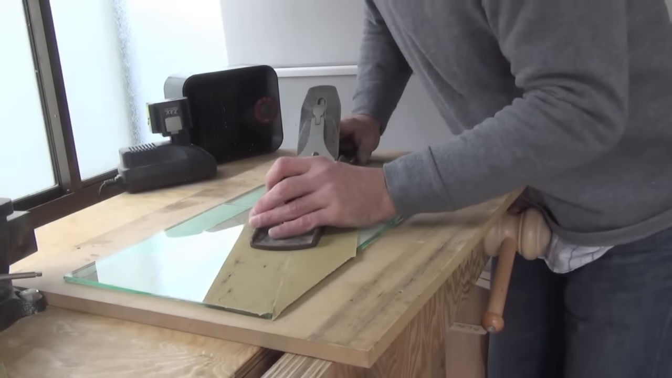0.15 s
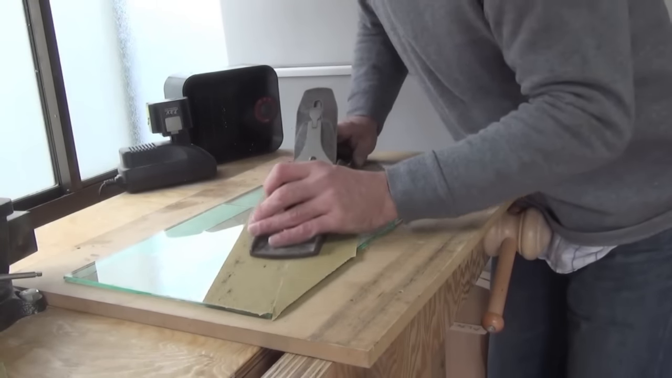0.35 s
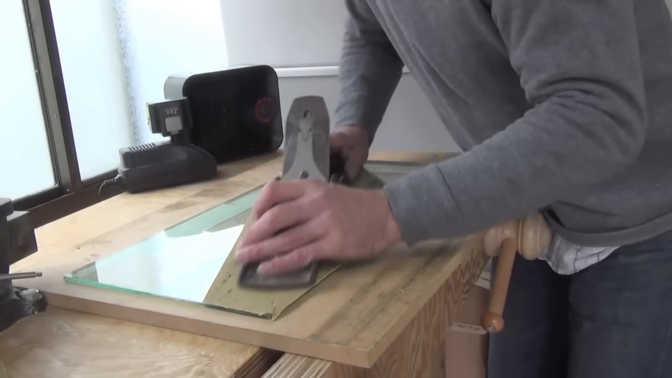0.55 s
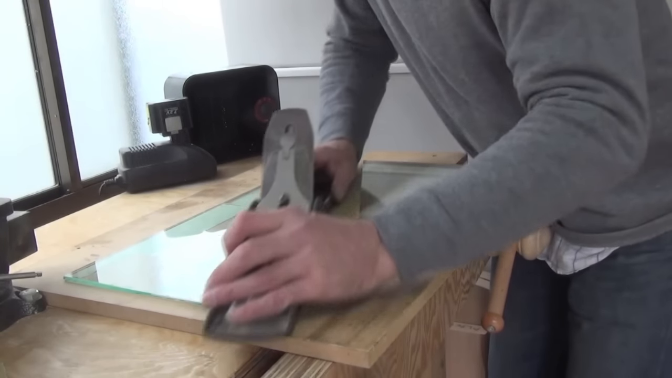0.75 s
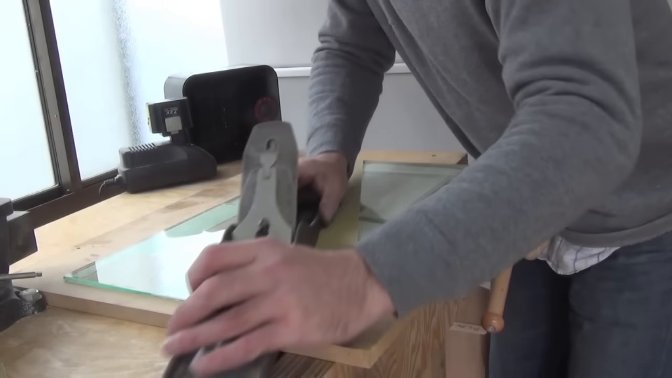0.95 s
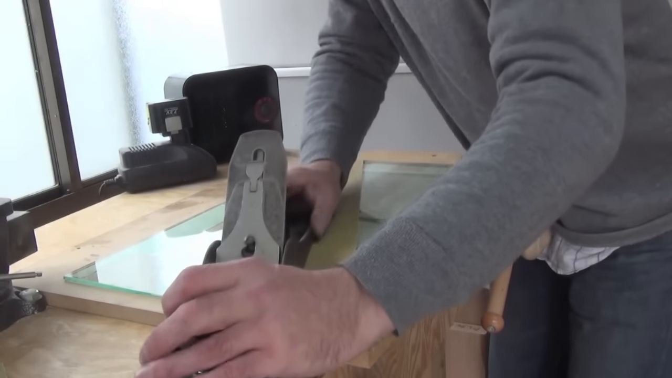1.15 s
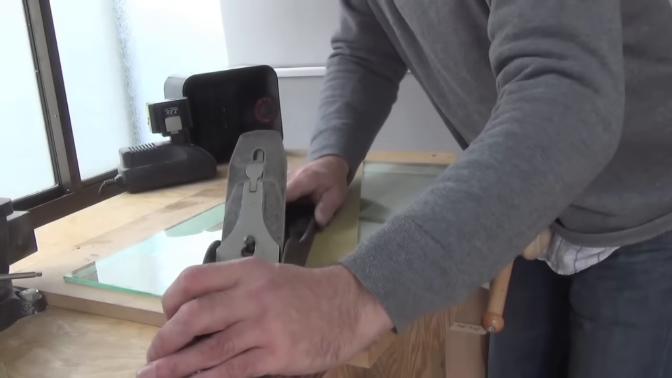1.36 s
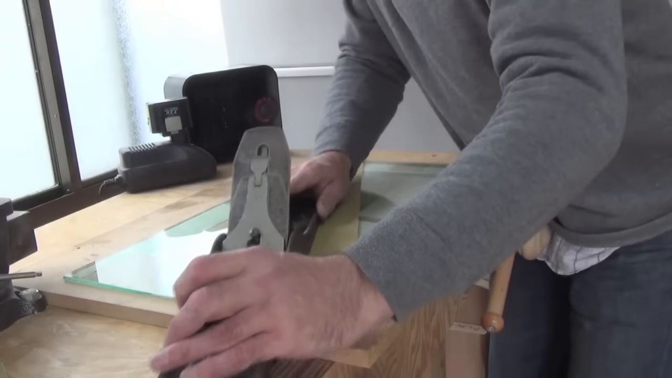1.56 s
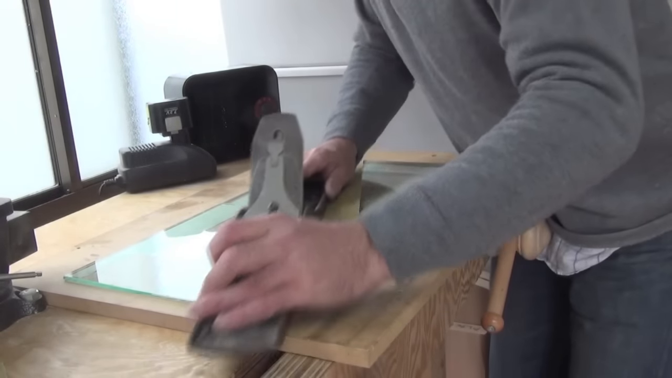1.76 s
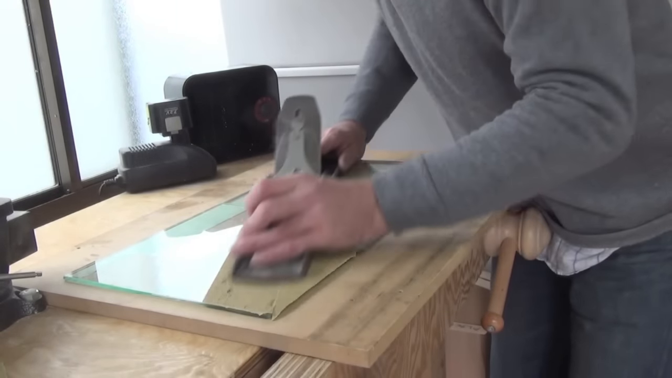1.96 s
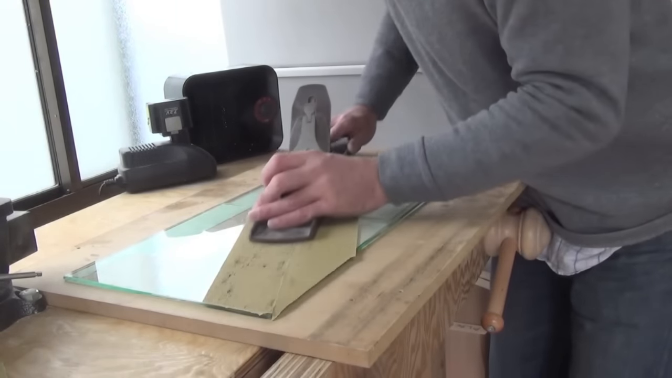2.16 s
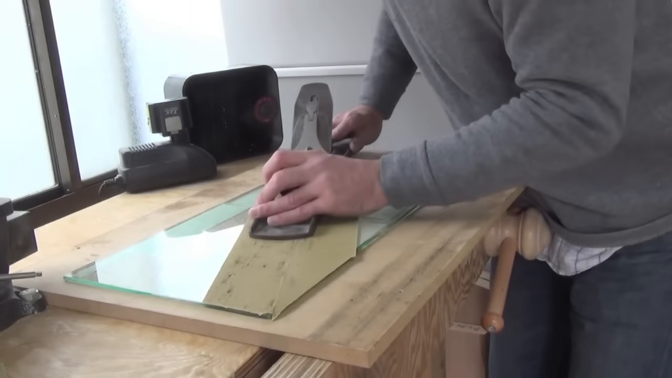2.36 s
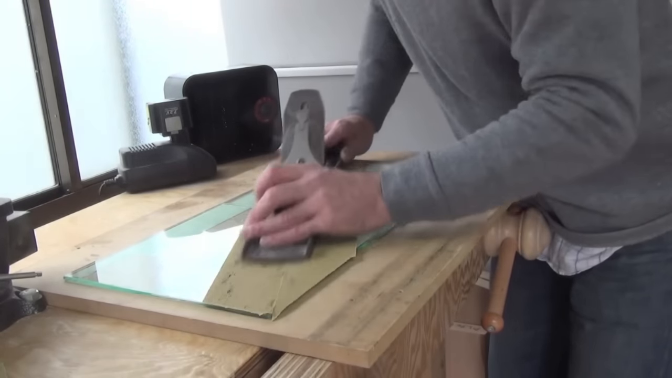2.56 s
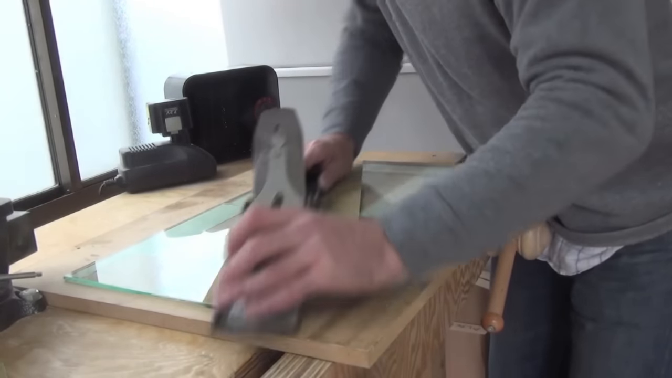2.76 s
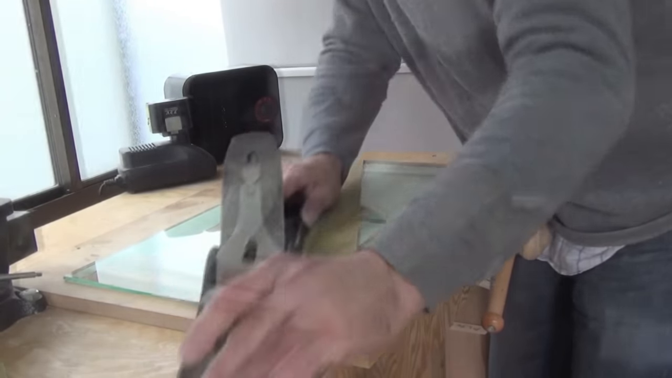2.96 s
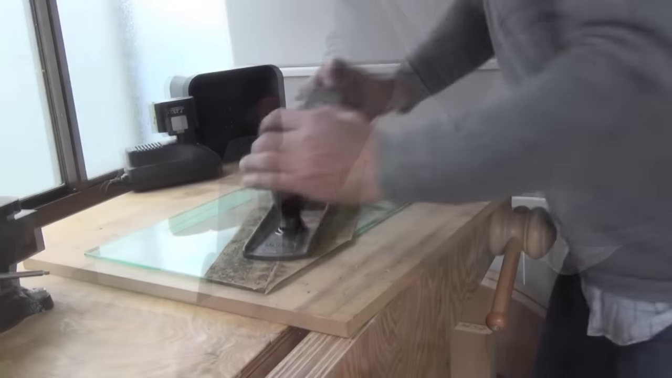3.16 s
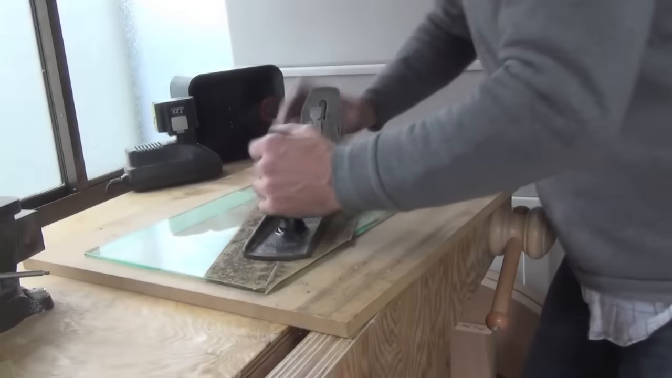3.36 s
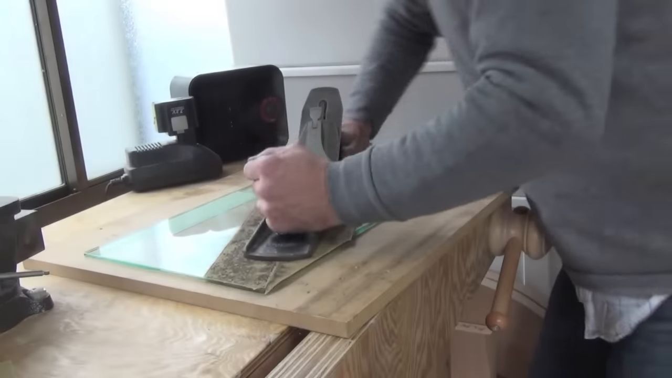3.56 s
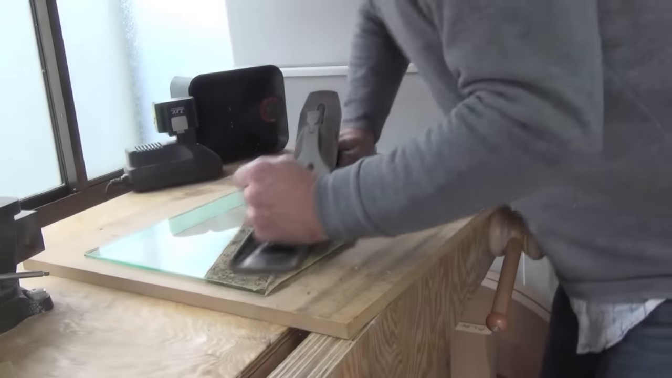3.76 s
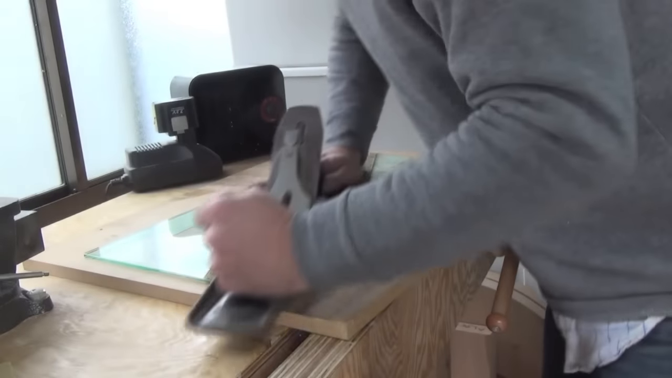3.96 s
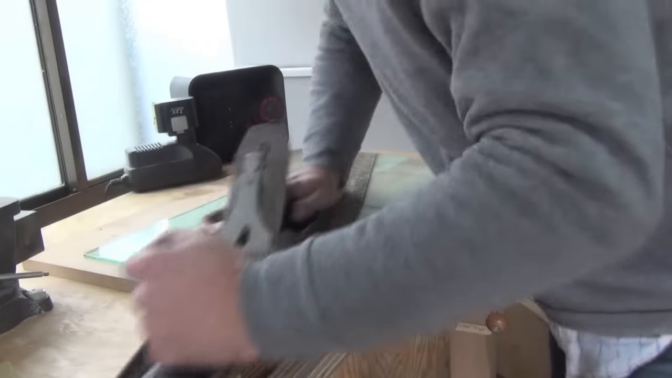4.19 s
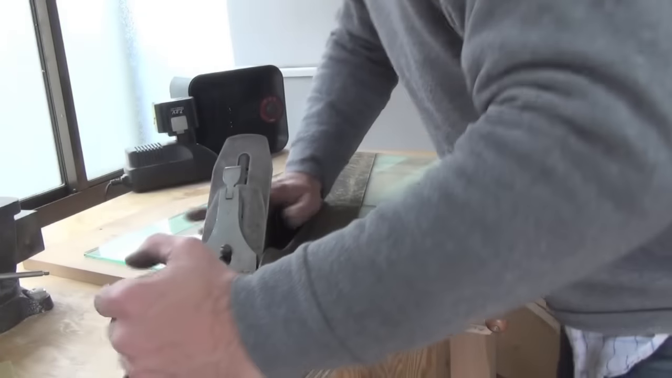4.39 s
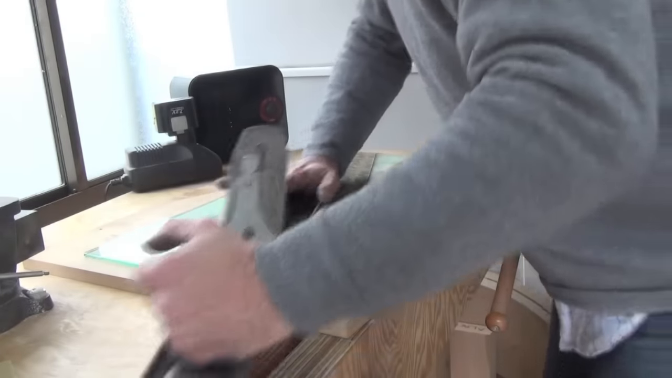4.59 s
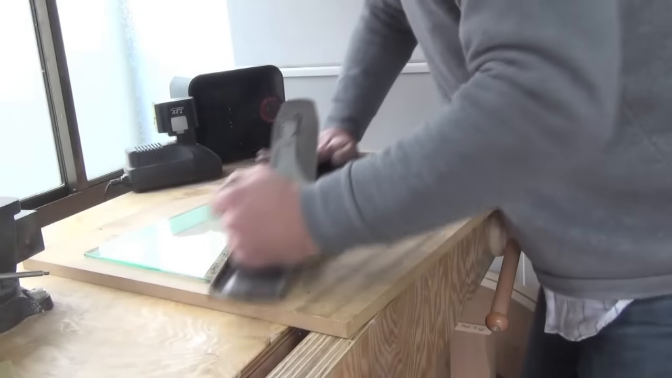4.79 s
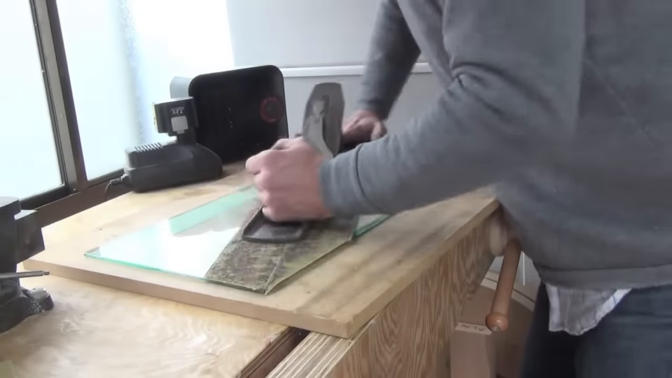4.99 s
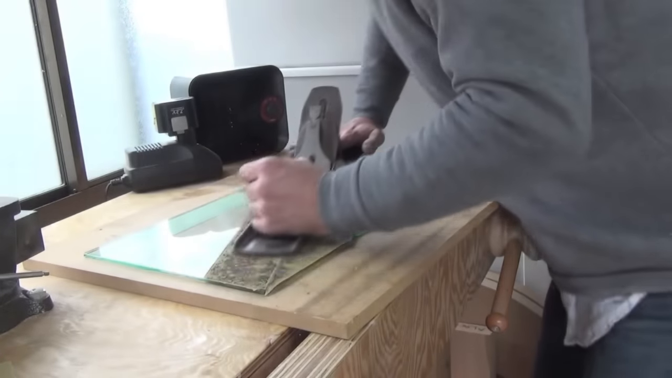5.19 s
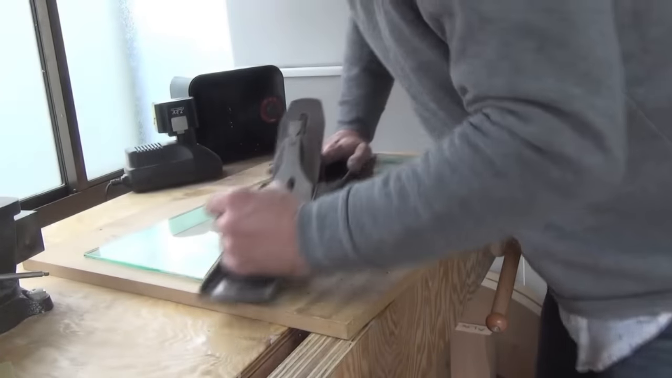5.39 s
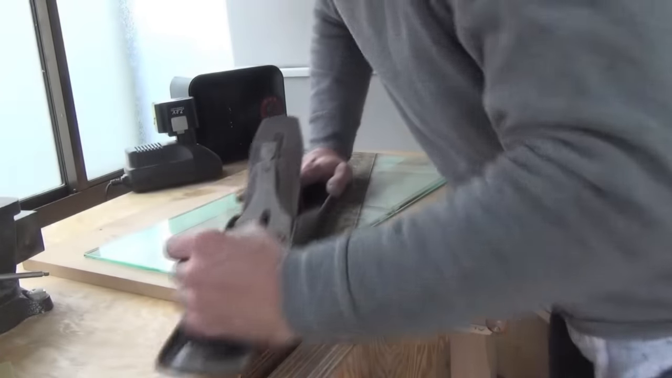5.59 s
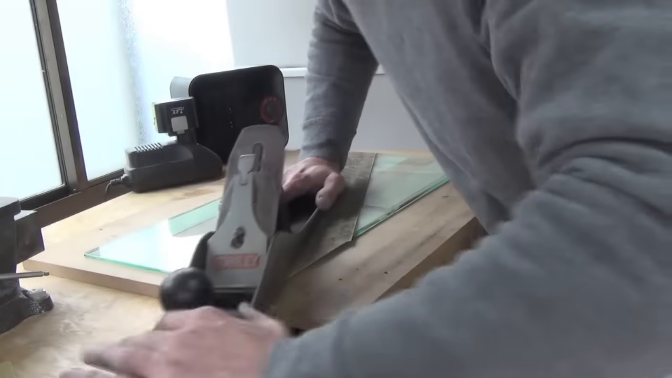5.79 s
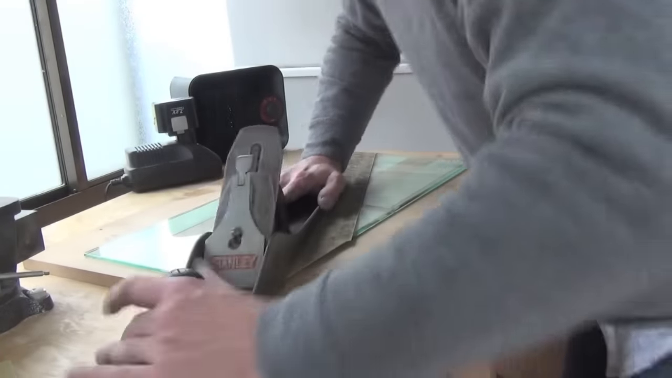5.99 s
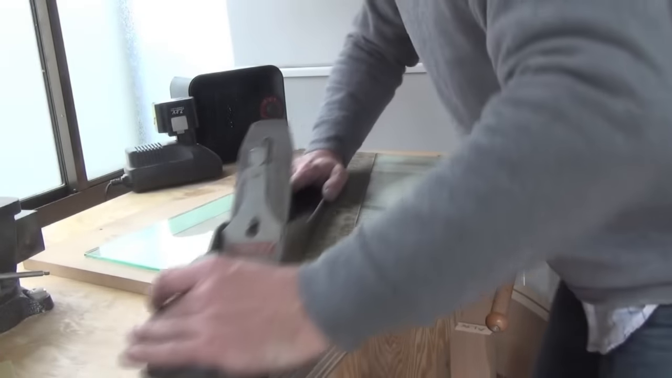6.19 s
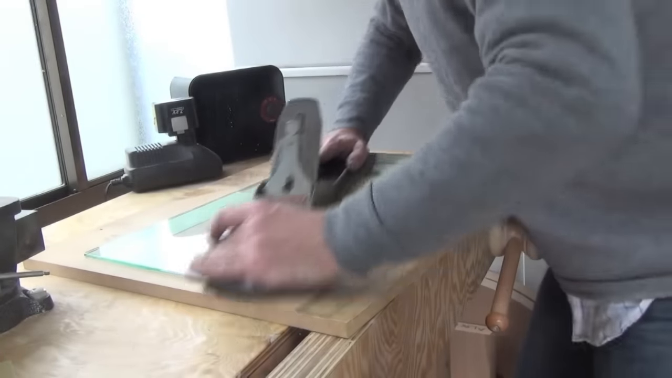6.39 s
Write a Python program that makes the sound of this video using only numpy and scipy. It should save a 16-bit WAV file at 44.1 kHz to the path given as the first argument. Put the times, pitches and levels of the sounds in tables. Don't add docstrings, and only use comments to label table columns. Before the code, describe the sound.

Close, rasping abrasive strokes of heavy iron on sandpaper swell and fade seven times, ringing faintly over bench rumble, with wooden knocks at turns.

```python
import sys
import numpy as np
from scipy import signal
from scipy.fft import rfft, irfft
from scipy.io import wavfile

SR = 44100
rng = np.random.default_rng(int(sys.argv[2]) if len(sys.argv) > 2 else 0)


def bounce(signal):
    frames = np.transpose(np.atleast_2d(signal))
    limited = np.clip(frames, -1, 1)
    pcm = np.round(limited * 32767).astype(np.int16)
    wavfile.write(sys.argv[1], SR, pcm)


def volts(x):
    e = np.asarray(x, float) / 20
    return 10 ** e


N = 284004


def rms_one(x):
    return x / np.sqrt(np.mean(x ** 2) + 1e-20)


def colour(x, points, skirt_db=0):
    hz = np.maximum(np.fft.rfftfreq(len(x), 1 / SR), 1)
    at, db = np.transpose(points)
    beyond = np.maximum(np.log2(at[0] / hz), 0) + np.maximum(np.log2(hz / at[-1]), 0)
    gain_db = np.interp(np.log(hz), np.log(at), db) - skirt_db * beyond
    return irfft(rfft(x) * volts(gain_db), len(x))


def share(x, low_hz, high_hz):
    hz = np.fft.rfftfreq(len(x), 1 / SR) + 1
    return irfft(rfft(x) / (1 + (low_hz / hz) ** 16) / (1 + (hz / high_hz) ** 16), len(x))


def drift(rate):
    r = np.exp(-80 * np.pi * rate / SR)
    slow = signal.lfilter([1], [1, -2 * r, r * r], rng.standard_normal(N // 40 + 2002))[2000:]
    return np.interp(np.arange(N) / 40, np.arange(len(slow)), rms_one(slow))


def resonance(x, hz, width_hz):
    r = np.exp(-np.pi * width_hz / SR)
    zeros = np.array([1, 0, -1]) * (1 - r * r) / 2
    return signal.lfilter(zeros, [1, -2 * r * np.cos(2 * np.pi * hz / SR), r * r], x)


def grit(per_s, uneven_db, clump_db):
    sizes = volts(uneven_db * np.minimum(rng.exponential(1, N), 5)) * rng.choice([-1, 1], N)
    strikes = rng.random(N) < per_s / SR
    return rms_one(sizes * strikes * volts(clump_db * drift(53)))


def body(broad, modes, wander_db):
    lifts = [(volts(lift_db + wander_db * drift(2.1)) - 1) * resonance(broad, hz, width)
             for hz, width, lift_db in modes]
    return rms_one(broad + sum(lifts))


def struck(rows, rise_s):
    out, t = np.zeros(N + SR), np.arange(SR // 2) / SR
    for s, db, hz, t60 in rows:
        swell = volts(db - 60 * t / t60) * (1 - np.exp(-t / rise_s))
        out[round(s * SR):][:len(t)] += swell * np.sin(2 * np.pi * hz * t)
    return out[:N]


def echoes(x, t60):
    t = np.arange(SR // 2) / SR
    tail = rng.standard_normal(len(t)) * volts(-60 * t / t60) * (t > .004)
    return signal.fftconvolve(x, tail / np.sqrt(np.sum(tail ** 2)))[:N]


def shop_air():
    # pitch in Hz, level in dB per Hz.
    air_colour = [(25, -13), (50, -11), (65, -1), (100, -8.5), (200, -19), (450, -9), (1000, -15.5),
                  (2000, -28), (4700, -24), (10000, -30), (15500, -33)]
    air = volts(-51) * rms_one(colour(rng.standard_normal(N), air_colour, skirt_db=20))
    hum = rms_one(resonance(rng.standard_normal(N), hz=79, width_hz=4.4))
    return air + volts(-53.5) * hum


def lever_ticks():
    # start in seconds, peak in dB, pitch in Hz, t60 in seconds.
    tick_rows = [
        (3.2487, -34, 3220, .08),
        (3.249, -30, 3300, 0.15),
    ]
    return struck(tick_rows, rise_s=.001)


def toe_taps():
    # start in seconds, peak in dB, pitch in Hz, t60 in seconds.
    tap_rows = [
        (3.629, -27, 270, .09),
        (3.63, -30, 440, .06),
        (3.631, -33, 690, .05),
        (3.645, -30, 160, .1),
    ]
    return struck(tap_rows, rise_s=0.0021)


def bench_knocks():
    # start in seconds, peak in dB, pitch in Hz, t60 in seconds.
    knock_rows = [(0.374, -26, 325, 0.15), (1.809, -29, 366, 0.15), (2.22, -24, 212, 0.13),
                  (3.106, -17.5, 129, 0.1), (3.135, -30, 292, 0.11), (3.16, -29.5, 150, 0.23),
                  (3.734, -24, 270, .12), (3.758, -16, 237, 0.12), (3.78, -24, 190, .08),
                  (3.811, -18.5, 244, 0.18), (5.42, -28, 208, 0.13), (6.335, -7.5, 314, 0.054)]
    # start in seconds, peak in dB, pitch in Hz, t60 in seconds.
    answer_rows = [
        (3.12, -28, 217, 0.21),
        (3.761, -27, 167, 0.26),
        (3.832, -22, 172.5, 0.13),
        (6.34, -22, 200, .1),
    ]
    return struck(knock_rows + answer_rows, rise_s=0.01)


def scuffs():
    # start in seconds, peak in dB, t60 in seconds.
    scuff_rows = [
        (1.498, -25.5, 0.14),
        (6.119, -26, 0.12),
    ]
    t = np.arange(N) / SR
    grains = colour(rng.standard_normal(N), [(500, 2), (4500, -6), (8000, -3.5), (14000, -15)], skirt_db=12)
    bursts = sum(volts(db - 3 - 60 * np.maximum(t - s, 0) / t60) * (t > s) for s, db, t60 in scuff_rows)
    return rms_one(grains) * bursts


def nudges():
    # time in seconds, level in dB.
    nudge_levels = [
        [(0.0, -48), (0.118, -50), (0.154, -40), (0.176, -50), (0.204, -46), (0.294, -55), (0.3, -61)],
        [(3.2, -54), (3.274, -42), (3.288, -40), (3.372, -36.5), (3.394, -47), (3.608, -38.5), (3.664, -48),
         (3.68, -52), (3.7, -68)],
    ]
    # pitch in Hz, width in Hz, level in dB.
    nudge_songs = [
        [(1020, 89, -1), (1540, 150, 2), (2200, 80, -6), (3310, 83, -2), (4000, 120, -15)],
        [(1560, 80, 1), (1670, 100, 3.5), (1856, 67, 5.5), (3450, 120, 0), (3900, 120, 3), (4120, 200, -1)],
    ]
    grains, t, out = grit(8300, uneven_db=6.0, clump_db=1.0), np.arange(N) / SR, 0
    for rows, modes in zip(nudge_levels, nudge_songs):
        song = sum(volts(db + 1.2 * drift(6.7)) * resonance(grains, hz, width) for hz, width, db in modes)
        level_db = np.interp(t, *np.transpose(rows), left=-120, right=-120) + 1.0
        out = out + rms_one(song) * volts(level_db)
    return out


def ramp(start, end, rise_s, fall_s):
    t = np.arange(N) / SR
    rise = np.sin(np.pi / 2 * np.clip((t - start) / rise_s, 0, 1))
    return rise * np.sin(np.pi / 2 * np.clip((end - t) / fall_s, 0, 1))


def motion():
    # start in seconds, end in seconds, top hiss in dB, speeding up in seconds,
    # slowing down in seconds.
    stroke_rows = [
        (0.253, 1.331, -14, 0.34, 0.23),
        (1.433, 2.411, -14, 0.49, 0.2),
        (2.409, 3.211, -14.5, 0.23, .3),
        (3.675, 4.494, -15, 0.35, 0.17),
        (4.495, 5.213, -16.5, 0.38, 0.31),
        (5.084, 6.015, -16, 0.34, 0.38),
        (6.126, 6.95, -17, 0.32, .3),
    ]
    # time in seconds, half width in seconds,
    # loss in dB (negative = surge).
    falter_rows = [(.56, 0.12, -0.8), (1.1, 0.076, 3), (1.78, 0.064, -2.5), (2.62, 0.07, -1.8),
                   (2.78, 0.047, -2.5), (3.89, 0.043, -2.5), (4.02, 0.075, -2), (4.14, 0.096, 2),
                   (4.58, 0.06, 1.5), (4.66, 0.059, -3), (5.58, .12, -2.5), (5.92, 0.067, -5),
                   (6.27, .04, -1)]
    # start in seconds, end in seconds, hiss in dB,
    # drive of the bodies against the hiss in dB.
    creep_rows = [
        (-.1, 0.049, -38.5, -5),
        (0.035, 0.305, -52.5, 0),
        (.1, 0.192, -48.5, 12),
        (1.3, 1.55, -45.5, -6),
        (3.166, 3.443, -39, -6),
        (3.39, 3.722, -39, -4.5),
        (4.452, 4.66, -38, -7),
        (5.977, 6.163, -50, -9),
    ]
    # time in seconds, load from 0 to 1.
    load_rows = [(.3, 0.47), (.7, 0.58), (1.0, 1), (1.2, 1), (1.6, 0.68), (1.9, 0.4), (2.3, 0.26),
                 (2.72, 0.55), (2.86, 0.05), (3.1, 0.0), (3.8, 0.35), (4.1, 0.78), (4.4, 0.71), (4.7, 0.57),
                 (5.05, 0.14), (5.6, 0.77), (5.9, 0.64), (6.4, 0.57)]
    edge_s, speed_power, rest = 0.076, 2.49, volts(2 * -60)
    t = np.arange(N) / SR
    power = sum((volts(db) * ramp(start, end, rise_s, fall_s) ** speed_power) ** 2
                for start, end, db, rise_s, fall_s in stroke_rows)
    loss_db = sum(db * np.exp(-((t - s) / width) ** 2) for s, width, db in falter_rows)
    power = power * volts(-2 * loss_db)
    creeps = [(volts(db) * ramp(start, end, edge_s, edge_s)) ** 2 for start, end, db, _ in creep_rows]
    hiss = power + sum(creeps) + rest
    drive = power + sum(c * volts(2 * row[-1]) for c, row in zip(creeps, creep_rows)) + rest
    under_way = power / hiss
    load = np.interp(t, *np.transpose(load_rows)) * under_way
    return 10 * np.log10(hiss), 10 * np.log10(drive), load, 1 - under_way


def layer_levels(hiss_db, drive_db, load, worn):
    # level at the knee in dB,
    # knee in dB, slope above in dB per dB, slope below in dB per dB.
    follow_laws = [(-36, -31, .65, 0.81), (-45.5, -36.5, 0.22, 0.74), (-45.5, -41, 0.042, 0.31),
                   (4, -23, 0.071, 0.26)]
    # worn paper in dB, full load on fresh paper in dB,
    # full load on worn paper in dB.
    layer_shifts = [(1.5, 0.5, -4), (4, 5.5, 6), (3.5, 9, 6.5), (1.5, 5, 6.5), (4.5, -1, -10)]
    laws = [hiss_db]
    for db, knee_db, above, below in follow_laws:
        over_db = drive_db - knee_db
        laws.append(db + above * np.maximum(over_db, 0) + below * np.minimum(over_db, 0))
    return [law + worn * worn_db + load * ((1 - worn) * load_db + worn * worn_load_db)
            for law, (worn_db, load_db, worn_load_db) in zip(laws, layer_shifts)]


def grain_hiss(top, worn, sparkle_db):
    # pitch in Hz, level in dB per Hz.
    fresh_paper = [(2470, -36), (4200, 2), (4760, -8), (6010, 0), (9600, 3), (11900, 0.5), (15400, -6.5)]
    # pitch in Hz, level in dB per Hz.
    worn_paper = [(2470, -30), (4200, 1), (4970, -7.5), (5790, -1), (10600, 0), (11900, -2.5),
                  (15400, -10.5)]
    # pitch in Hz, width in Hz, lift in dB.
    sole_modes = [(5720, 740, 2), (7500, 51, 2.4), (8300, 360, 1.2), (9650, 160, 0.37)]
    hiss = (1 - worn) * rms_one(colour(top, fresh_paper)) + worn * rms_one(colour(top, worn_paper))
    hiss = body(hiss, sole_modes, wander_db=-3.0)
    return hiss + (volts(sparkle_db) - 1) * share(hiss, 11900, SR)


def casting_ring(ring, worn, load):
    # pitch in Hz, level in dB per Hz.
    fresh_ring = [(560, -30), (950, 5), (1150, -10), (1240, -1), (1330, -2.5), (1700, -5), (2520, 0),
                  (3200, -1), (3620, 2.5), (4670, -3.5), (5400, 1.5), (7020, -28), (11900, -120)]
    # pitch in Hz, level in dB per Hz.
    worn_ring = [(560, -39), (950, -30), (1060, -18), (1230, -6), (2950, -0.5), (3250, -0.5), (3780, 1.5),
                 (4770, -5), (5400, 0.5), (7020, -36), (11900, -120)]
    # pitch in Hz, width in Hz, lift in dB.
    iron_modes = [(1257, 47, 2.5), (1428, 45, 3.5), (1535, 160, 2.5), (1700, 13, -14), (1925, 77, 0.5),
                  (2460, 13, 2), (2830, 7, -1.5), (3180, 16, -7), (3250, 88, 1.5), (3680, 170, -9),
                  (3700, 34, 3), (3670, 35, 7), (4470, 350, -1.5)]
    casting = (1 - worn) * rms_one(colour(ring, fresh_ring)) + worn * rms_one(colour(ring, worn_ring))
    casting = body(casting, iron_modes, wander_db=1.5)
    return casting + (volts(0.5 * (load - .5)) - 1) * share(casting, 2200, SR)


def glass_ring(grains):
    # pitch in Hz, level in dB per Hz.
    plate_colour = [(230, -42), (390, 5), (517, -9), (673, -4.5), (889, -1.5), (1010, -2), (1160, 10),
                    (1250, 15.5), (1620, -29), (2750, -120)]
    # pitch in Hz, width in Hz, lift in dB.
    plate_modes = [(549, 130, 5), (587, 11, 5.9), (698, 120, 3.4), (880, 20, 1.4), (913.5, 39, 8.1)]
    return body(colour(grains, plate_colour), plate_modes, wander_db=1.6)


def bench_rumble(grains):
    # pitch in Hz, level in dB per Hz.
    wood_colour = [(59, -49), (100, -15.5), (194, 0), (243, 0.5), (279, -7), (312, -2.5), (339, -11),
                   (520, 2), (680, -33), (1140, -120)]
    # pitch in Hz, width in Hz, lift in dB.
    wood_modes = [(147, 34, 3.8), (200, 7.8, 0.44), (245, 120, 1.2), (337, 25, 3.1), (365, 49, 6.7)]
    return body(colour(grains, wood_colour), wood_modes, wander_db=2.5)


def sanding():
    hiss_db, drive_db, load, creeping = motion()
    grains = grit(20000, uneven_db=1.36, clump_db=0.55)
    low, middle, high = 450, 1100, 4800
    worn = np.clip((np.arange(N) / SR - 2.99) / 0.1, 0, 1)
    hiss_db, casting_db, glass_db, bench_db, sparkle_db = layer_levels(hiss_db, drive_db, load, worn)
    sparkle_db = sparkle_db + creeping * np.interp(worn, [0, 1], [3, -4])
    hiss = grain_hiss(share(grains, high, SR), worn, sparkle_db)
    casting = casting_ring(share(grains, middle, high), worn, load)
    glass = glass_ring(share(grains, low, middle))
    bench = bench_rumble(share(grains, 1, low))
    return volts(hiss_db) * hiss + volts(casting_db) * casting + volts(glass_db) * glass + volts(bench_db) * bench


def unlike(mid):
    # low edge in Hz, high edge in Hz, level under the mid in dB, flicker in dB.
    width_bands = [(40, 340, -31, 7), (396, 1520, -26, 1.5), (1510, 1600, -35.5, 7.5),
                   (2400, 3640, -38.5, 8), (3480, 4220, -27.5, -0.5), (4530, 5400, -25, -5),
                   (5400, 6060, -22.5, 6.5), (6360, 7400, -28.5, 9), (9400, 10500, -28.5, 10.5),
                   (10900, 13200, -43.5, 12)]
    scattered = echoes(mid, t60=0.032) + 1.96 * mid
    out = 0
    for low_hz, high_hz, db, flicker_db in width_bands:
        band = signal.butter(2, [low_hz, high_hz], "band", fs=SR, output="sos")
        flicker = volts(db + flicker_db * np.minimum(drift(11.7), 1.3))
        out = out + flicker * signal.sosfilt(band, scattered)
    return out


def scene():
    # pitch in Hz, left minus right in dB.
    port_lean = [(60, -4.5), (110, -2), (200, -3), (380, 2.5), (700, 1.5), (1290, 1.5), (2380, 10),
                 (4400, 33), (8120, 0.5), (15000, 0.0)]
    near = sanding() + nudges() + bench_knocks() + toe_taps() + lever_ticks() + scuffs()
    mid = near + volts(-12.5) * echoes(near, t60=0.1) + shop_air()
    hz, lean_db = np.transpose(port_lean)
    half = np.transpose([hz, lean_db / 2 / (1 + (hz / 1600) ** 4)])
    side = unlike(mid)
    return np.array([colour(mid, half) + side, colour(mid, half * [1, -1]) - side])


def low_pass(x):
    return signal.sosfilt(signal.butter(12, 16910, fs=SR, output="sos"), x)


def record(dry):
    rounded = 1.398 * np.tanh(dry / 1.611)
    spectrum = rfft(rounded) * (np.fft.rfftfreq(N, 1 / SR) < 15620)
    return low_pass(irfft(spectrum, N))


dry = scene()
out = record(dry)
bounce(out)
```